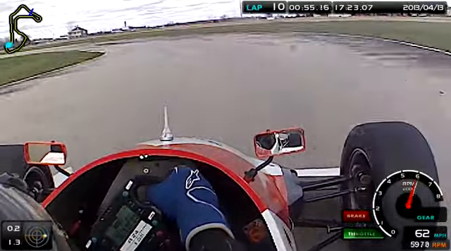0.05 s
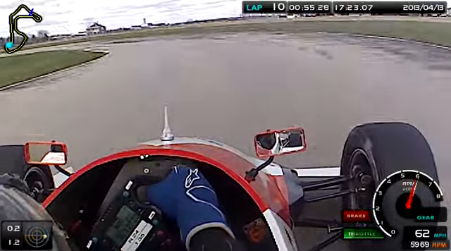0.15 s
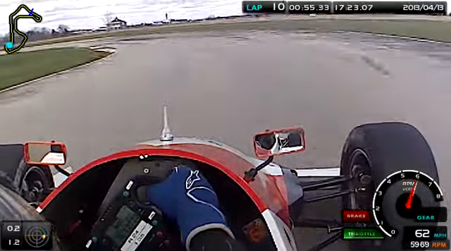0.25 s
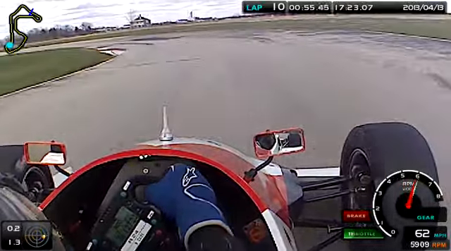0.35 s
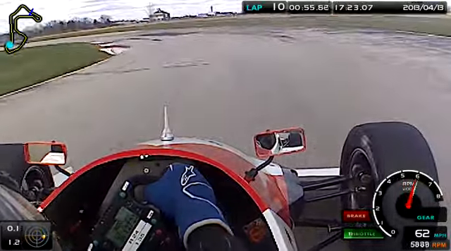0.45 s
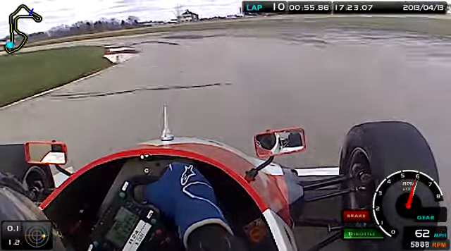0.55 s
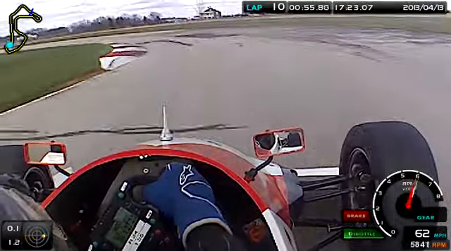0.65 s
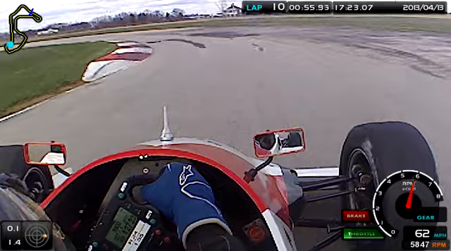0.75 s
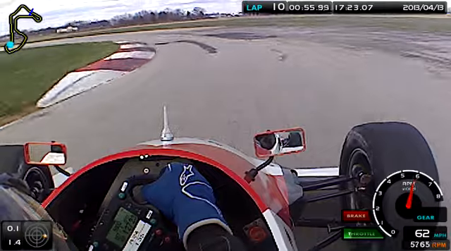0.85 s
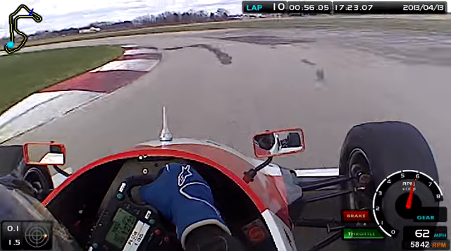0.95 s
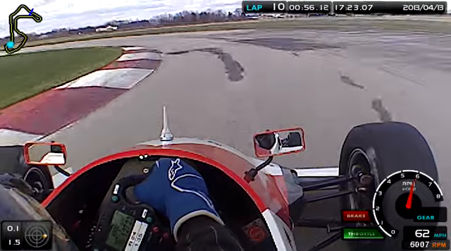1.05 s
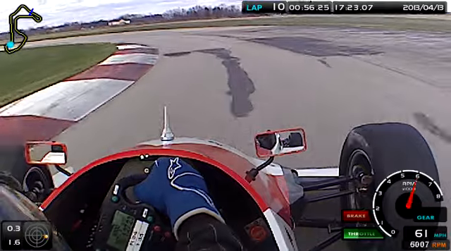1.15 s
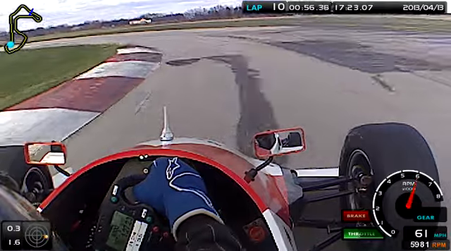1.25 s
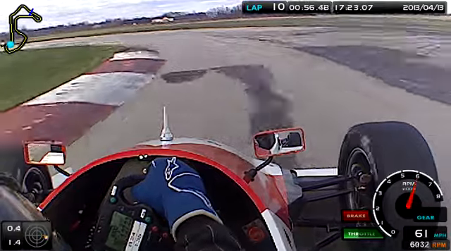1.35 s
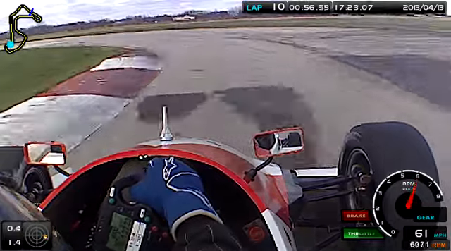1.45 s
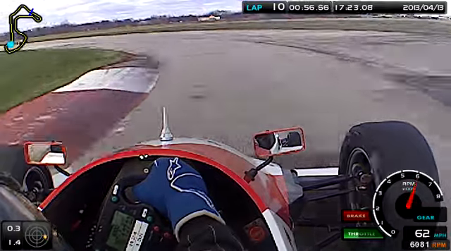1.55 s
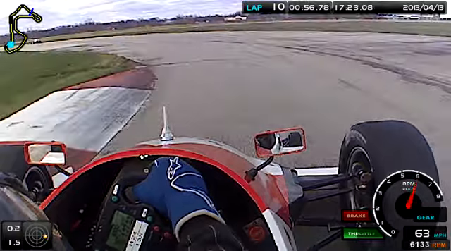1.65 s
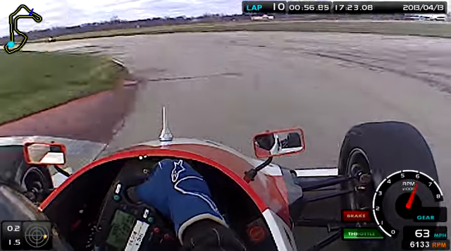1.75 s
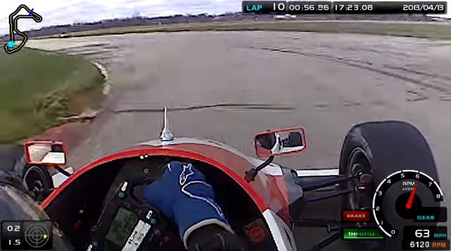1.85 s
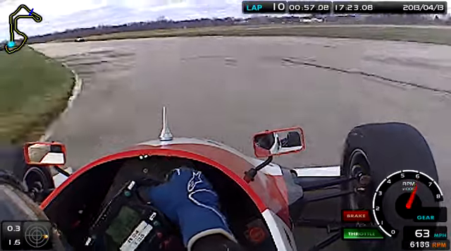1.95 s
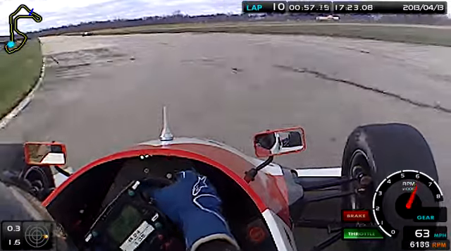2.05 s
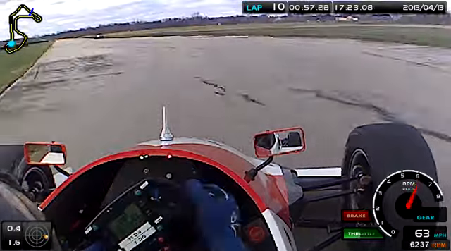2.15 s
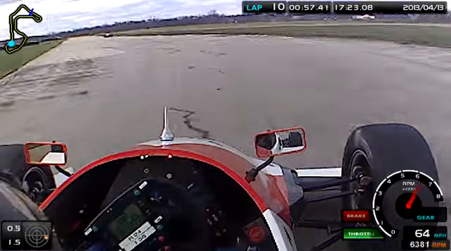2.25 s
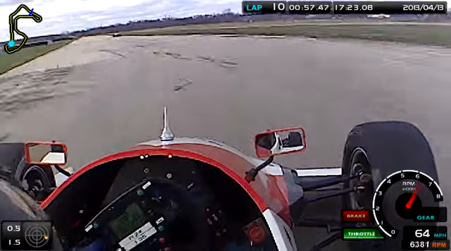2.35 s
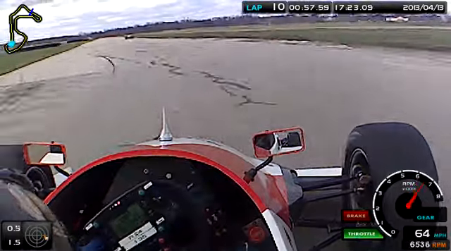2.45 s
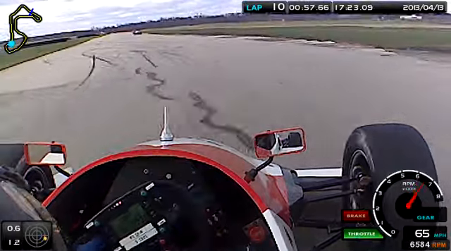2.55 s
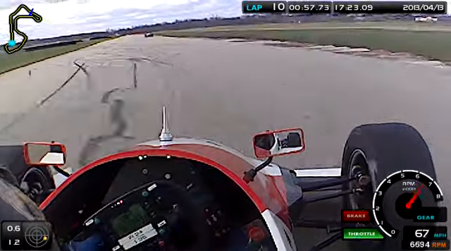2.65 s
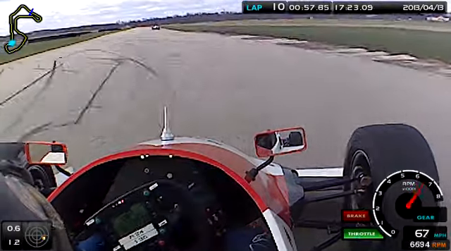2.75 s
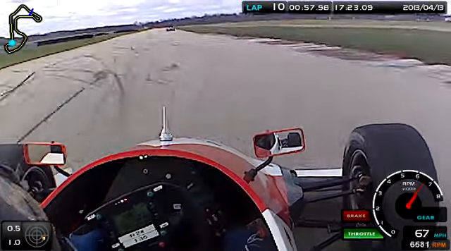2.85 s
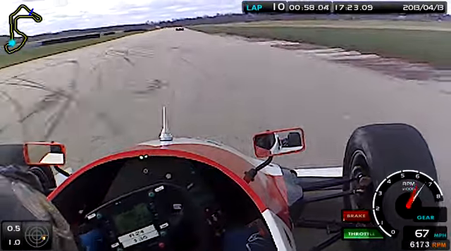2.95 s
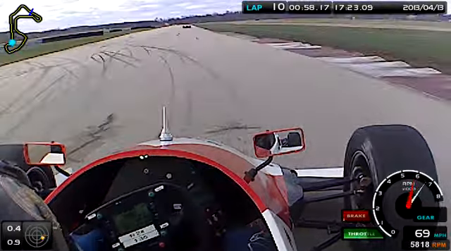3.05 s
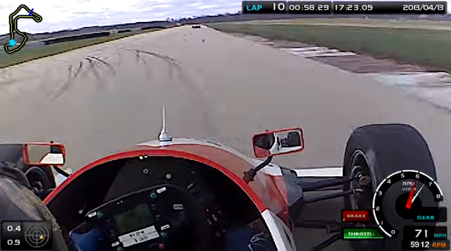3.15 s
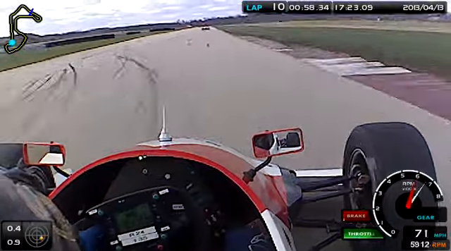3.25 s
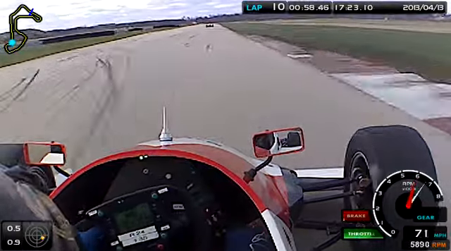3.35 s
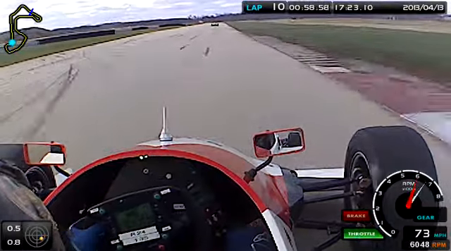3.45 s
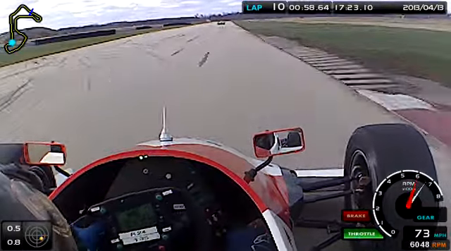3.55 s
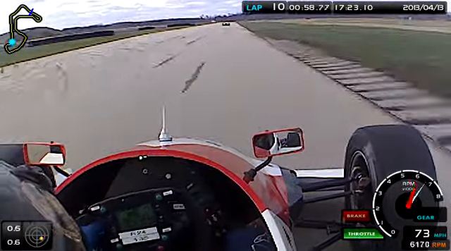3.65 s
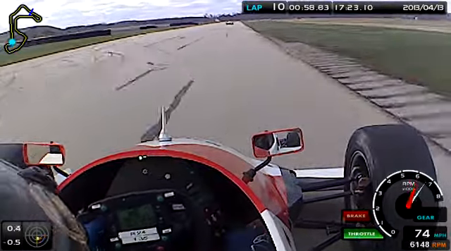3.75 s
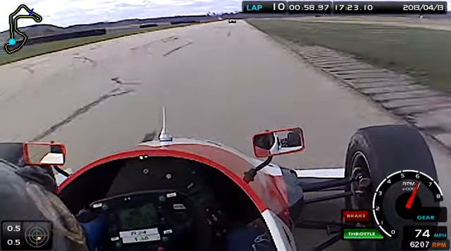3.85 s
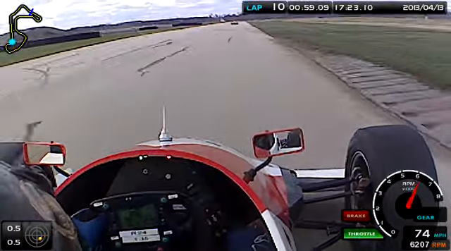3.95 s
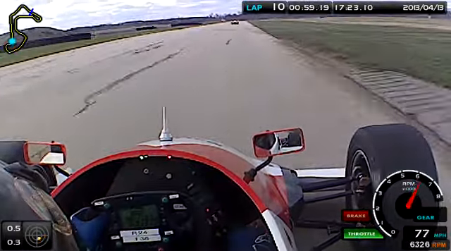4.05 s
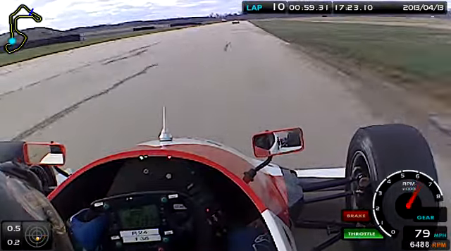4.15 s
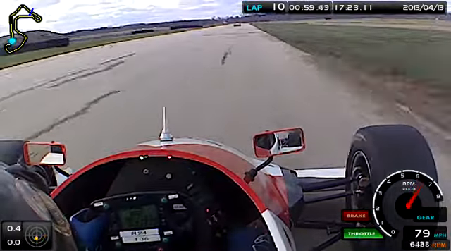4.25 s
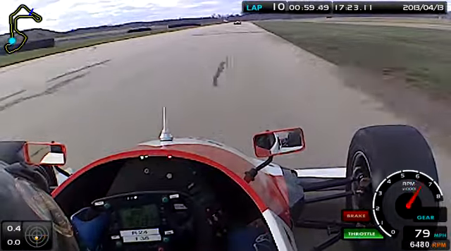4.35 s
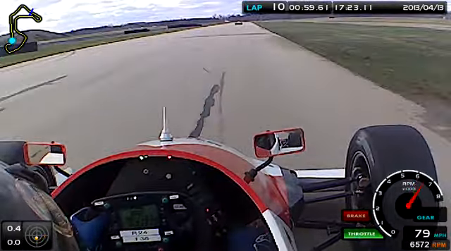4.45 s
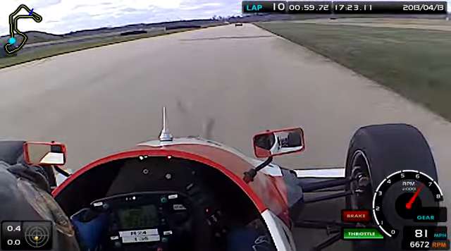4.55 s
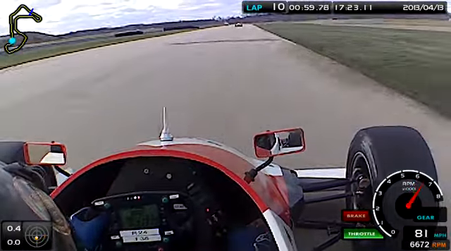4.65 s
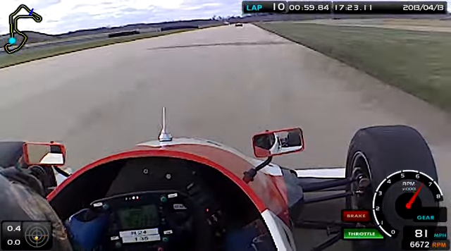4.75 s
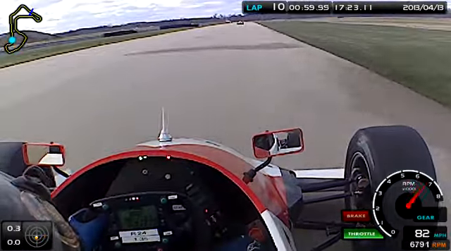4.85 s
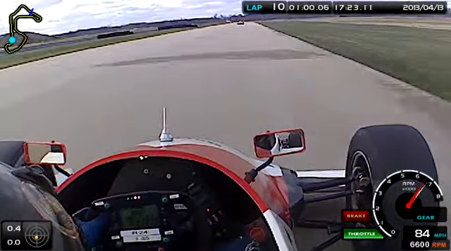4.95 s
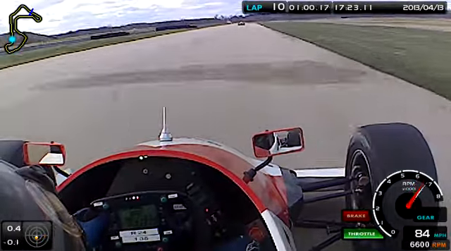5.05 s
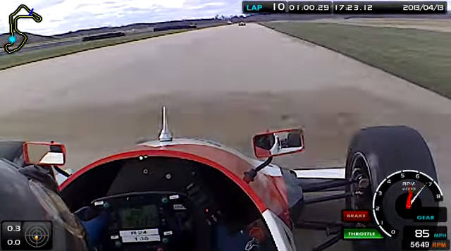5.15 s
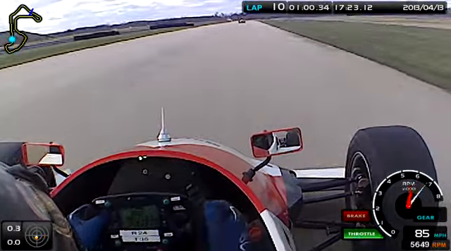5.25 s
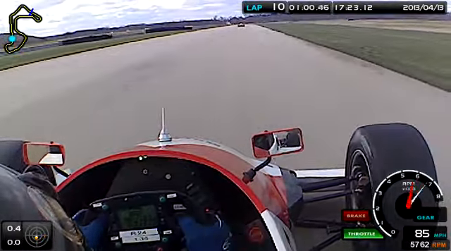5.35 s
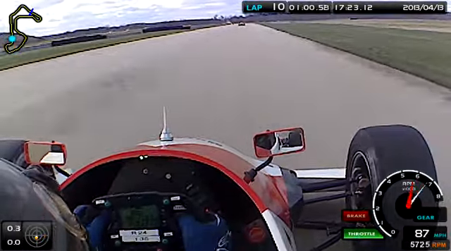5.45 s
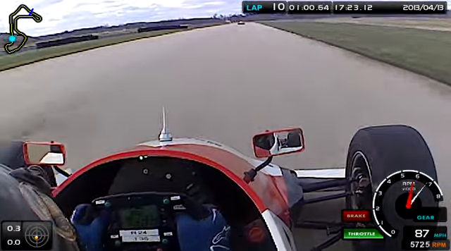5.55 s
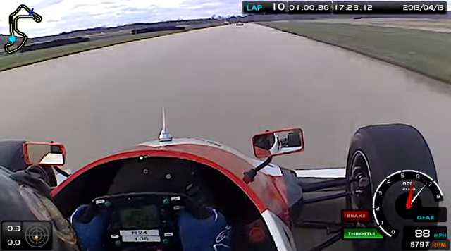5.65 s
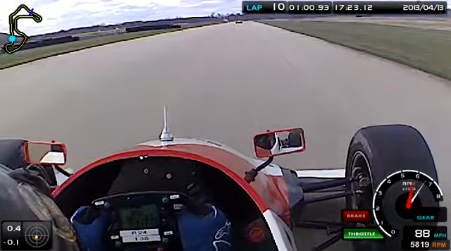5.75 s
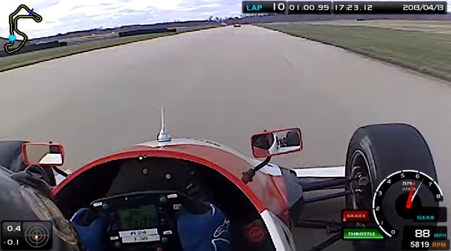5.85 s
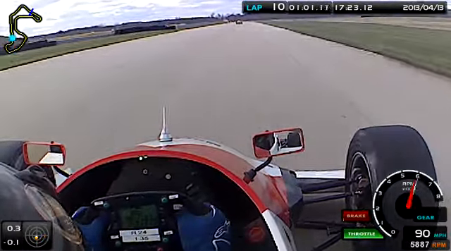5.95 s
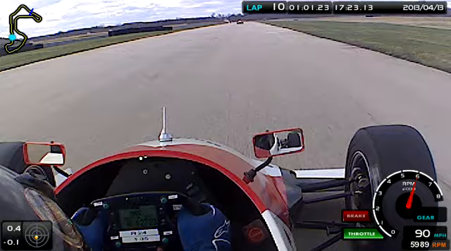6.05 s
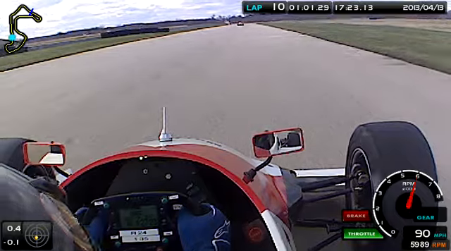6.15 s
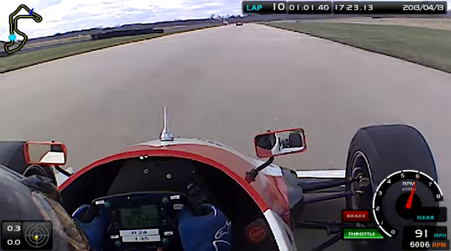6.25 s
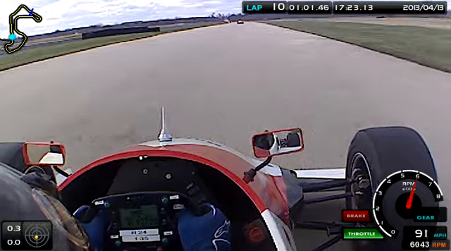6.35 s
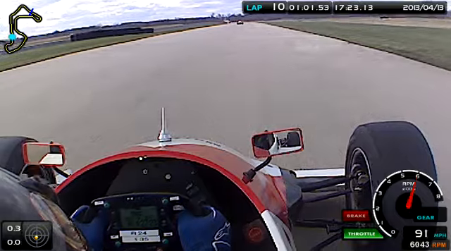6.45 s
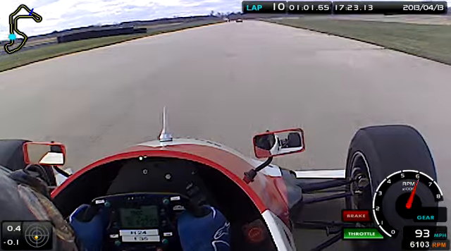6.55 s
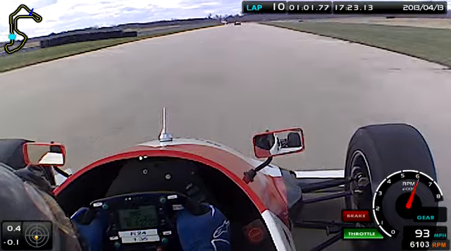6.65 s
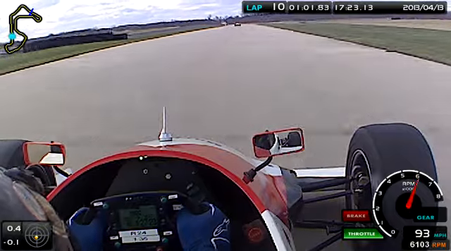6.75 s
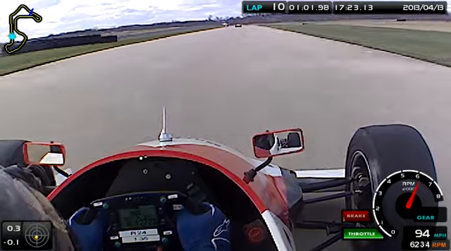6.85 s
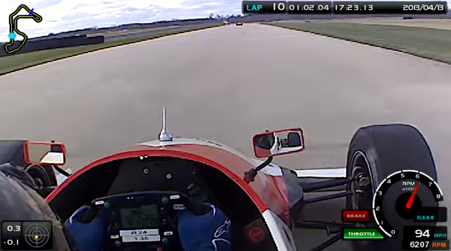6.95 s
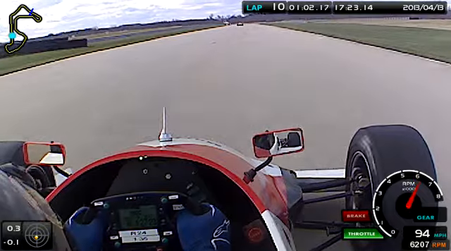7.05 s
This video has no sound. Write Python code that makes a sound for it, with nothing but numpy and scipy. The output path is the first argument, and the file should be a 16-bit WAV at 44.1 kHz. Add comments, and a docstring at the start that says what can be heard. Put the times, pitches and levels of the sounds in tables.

```python
"""A rotary-engined open-wheel race car from the cockpit, its firing pulses ringing the exhaust and
bodywork while wind buffets the microphone. It starts on a feathered throttle through a corner, takes
a stab at the apex (0.7 s) and eases off. From 1.8 s it is flat out, with a hard rasp. At 2.6 s and
4.8 s the spark cuts, the next gear thuds in and the driveline shudders; then the revs climb to the
end. Throughout, the small 16 kHz recorder overloads on the loudest stretches."""
import sys
import numpy as np
from scipy import signal
from scipy.fft import rfft, irfft
from scipy.io import wavfile
from scipy.ndimage import uniform_filter1d

SR = 44100
rng = np.random.default_rng(int(sys.argv[2]) if len(sys.argv) > 2 else 0)


def store_pcm(level_fs):
    """Save levels as 16-bit WAV."""
    pcm = np.round(np.clip(level_fs, -1, 1) * 32767).astype(np.int16)
    wavfile.write(sys.argv[1], SR, np.atleast_2d(pcm).T)


N = 313110
TIME = np.arange(N) / SR
HZ = np.fft.rfftfreq(N, 1 / SR)

# revs of the eccentric shaft, climbing through three gears: (time [s], speed [turns/s])
SHAFT_SPEED = [(0.0, 98.6), (0.43, 98.3), (0.58, 95.9), (0.8, 100.3), (1.09, 100.5), (1.69, 102.5),
               (2.08, 108.0), (2.56, 112.7), (2.69, 104.1), (2.72, 97.9), (2.82, 96.2), (3.25, 100.5),
               (4.7, 114.4), (4.78, 109.5), (4.82, 92.5), (5.29, 95.8), (6.22, 101.4), (7.1, 105.7)]
# the driver's foot: (time [s], throttle [0-1])
THROTTLE = [(.67, .2), (.76, .7), (.95, .7), (1.08, .5), (1.74, .5), (1.83, 1)]
# the mix under the pedal: (throttle [0-1], note [dB], howl [dB], sizzle [dB], fizz [dB],
# shaft-rate throb [dB], firing-rate drone [dB], raggedness [0-1])
THROTTLE_MIX = [(.2, -31.5, -32, -37.5, -41, -18, -24.5, 0.5), (.5, -31, -29, -34, -35.5, -32, -19.5, 0),
                (.7, -26.5, -28.5, -28.5, -33.5, -24, -22, 0.12),
                (1, -26.5, -21, -21.5, -26.5, -48, -47, 0.1)]
# what the firing harmonics excite as the revs sweep up:
# (speed [turns/s], shaft-rate boom [dB], firing-rate boom [dB], howl lift [dB])
SPEED_MIX = [(92.5, -40, -26, -1), (96.1, -37.5, -29.5, -0.5), (98.1, -30, -39, -1.5),
             (99.6, -29, -33.5, -2.5), (102.7, -26, -25, -3.5), (107.2, -24, -26, 1.5),
             (113.1, -22.5, -21.5, -2)]
# each gear's character: (shudder rate [Hz], note [dB], sizzle [dB], fizz [dB], raggedness [factor])
GEARS = [(7.26, -.5, -1.5, -1, 1.32), (6.59, 0.2, 0.5, -2, 0.97), (9.18, -0.53, -1, -2.5, 1.32)]
def engine(mid_speed=100, surge_hz=17.6, first_surge_s=0.037):
    """Two rotors fire into the exhaust; throttle, revs and gear ride the faders of its layers."""
    (speed,), (throttle,) = curves(SHAFT_SPEED), curves(THROTTLE)
    note_db, howl_db, sizzle_db, fizz_db, throb_db, drone_db, ragged = curves(THROTTLE_MIX, throttle)
    shaft_db, firing_db, howl_lift_db = curves(SPEED_MIX, speed)
    _, gear_note_db, gear_sizzle_db, gear_fizz_db, gear_ragged = np.array(GEARS)[gear_at(TIME)].T
    revs_db = 0.2328 * (speed - mid_speed)
    ragged = ragged * gear_ragged * np.exp((mid_speed - speed) / 32)  # smoother as the revs rise
    unlit, cut_db = ignition_cuts()
    noisy = ragged + 0.39 * unlit  # without spark only gas is pumped through
    # on a light throttle the burning comes in surges
    surge = ragged ** 2 * np.cos(2 * np.pi * surge_hz * (TIME - first_surge_s))
    swing = driveline_shudder()
    turns = np.cumsum(speed + swing + 0.99 * surge) / SR
    low_end = boom(turns, np.maximum(shaft_db, throb_db), np.maximum(firing_db, drone_db))
    gas = gas_puffs(turns)
    swell = firings(turns, imbalance=0.083, scatter=0.012, jitter_s=12e-6)  # each pulse's body
    crack = firings(turns, imbalance=0.21, scatter=0.12, jitter_s=7e-6)  # its steep, bright front
    note = exhaust_note(swell, gas, 0.31 * ragged + 0.83 * unlit, note_db + gear_note_db + revs_db)
    treble = howl(crack, gas, noisy, howl_db + howl_lift_db)
    treble += rasp(crack, gas, noisy, swing)
    treble += gain_of(revs_db) * top_end(crack, gas, noisy, sizzle_db + gear_sizzle_db,
                                         fizz_db + gear_fizz_db)
    exhaust = note + flicker(surge, ragged) * treble
    return gain_of(-1.7 - 0.3 * cut_db) * low_end + gain_of(-cut_db) * exhaust


def firings(turns, imbalance, scatter, jitter_s):
    """Two exhaust pulses per shaft turn; the rotors differ, and no two burns are quite alike."""
    stroke = np.floor(2 * turns).astype(int)
    onsets = np.flatnonzero(np.diff(stroke))
    size_chance, time_chance = rng.standard_normal((len(onsets), 2)).T
    size = 1 + imbalance * (-1) ** stroke[onsets] + scatter * size_chance
    place = np.interp(stroke[onsets + 1], 2 * turns, np.arange(N)) + jitter_s * SR * time_chance
    taps = np.round(place).astype(int)[:, None] + np.arange(-8, 9)
    offset = taps - place[:, None]
    pulses = size[:, None] * np.sinc(offset) * np.sinc(offset / 9)  # clicks placed between samples
    return np.bincount(np.clip(taps, 0, N - 1).ravel(), pulses.ravel(), N)


def gas_puffs(turns, decay_cycles=1.0, steady=0.046):
    """Turbulent gas: a burst of noise each time a port opens, fading through the cycle."""
    return (steady + np.exp(-(2 * turns % 1) / decay_cycles)) * rng.standard_normal(N)


# upper resonances of silencer and bodywork: (pitch [Hz], width [Hz], level [dB])
RASP_MODES = [(2042, 51, -2), (2267, 73, 6.5), (2379, 24.5, 8), (2484, 9.7, 0.5), (2602, 62, 6),
              (2761, 40.5, 8.5), (2861, 32.5, 5.5)]
# the rasp's fader through the pull in each gear: (time [s], level [dB])
RASP_LEVEL = [(0.0, -25), (0.67, -26), (0.76, -17.5), (1.37, -18.5), (1.75, -19.5), (1.8, -13),
              (2.28, -7.5), (2.6, -14.5), (2.71, -16), (2.92, -15.0), (2.97, -9.5), (3.24, -13),
              (3.56, -11.9), (3.9, -8.5), (4.44, -13), (4.68, -8), (4.86, -14), (4.93, -9.5), (5.5, -14.5),
              (5.86, -9.5), (5.9, -12), (6.69, -7.5), (7.09, -8)]
# the broad band that the pulse fronts hit hardest: (time [s], centre [Hz])
BITE_CENTRE = [(0, 2280), (.64, 2630), (.73, 2070), (1.3, 2210), (1.78, 2720), (2.3, 2765), (3.1, 2580),
               (3.39, 2760), (3.53, 2470), (4.21, 2570), (4.29, 2430), (4.74, 2530), (4.92, 2570),
               (6.38, 2840), (6.66, 2470), (6.92, 2810)]
def rasp(crack, gas, noisy, swing):
    """The hard edge: pulse fronts ring silencer and bodywork, swelling as the revs flare."""
    (level_db,), (bite_hz,) = curves(RASP_LEVEL), curves(BITE_CENTRE)
    bite = resonate(cockpit_reflections(crack, decay_s=0.0022), bite_hz, width_hz=530)
    gain = gain_of(level_db + 0.77 * swing + 1.03 * wander(rate_hz=24))
    return gain * voiced(bite, gas, RASP_MODES, noisy)


# lower resonances of silencer and bodywork: (pitch [Hz], width [Hz], level [dB])
HOWL_MODES = [(1505, 28, 0), (1567, 55, -2), (1749, 49, -3.5), (1901, 20.3, -1)]
def howl(crack, gas, noisy, level_db):
    """Pulse fronts ring a wavering midrange howl out of silencer and bodywork."""
    return gain_of(level_db + 1.02 * wander(rate_hz=19)) * voiced(crack, gas, HOWL_MODES, noisy)


# resonances of the exhaust pipe: (pitch [Hz], width [Hz], level [dB])
PIPE_MODES = [(475, 81, -10), (590.6, 25, -8), (663.6, 46, -12), (827, 75, -15.5), (1010, 36, -14),
              (1077.5, 24, -11), (1450, 225, -22.5)]
def exhaust_note(swell, gas, noisy, level_db):
    """The body of each pulse rings the pipe."""
    return gain_of(level_db + 0.8 * wander(rate_hz=11)) * voiced(swell, gas, PIPE_MODES, noisy)


def boom(turns, shaft_db, firing_db):
    """The low end: one wavering sine at the shaft rate, one at the firing rate an octave up."""
    return sum(np.sqrt(2) * gain_of(db + 1.1 * wander(rate_hz=26)) * np.sin(2 * np.pi * order * turns)
               for order, db in ((1, shaft_db), (2, firing_db)))


# top resonances of silencer and bodywork: (pitch [Hz], width [Hz], level [dB])
SIZZLE_MODES = [(2990, 42, -17), (3189, 140, -14), (3409, 123, -16), (3767, 90, -18.5)]
# the highest, broad resonances of the exhaust: (pitch [Hz], width [Hz], level [dB])
FIZZ_MODES = [(3590, 125, -25.5), (4223, 165, -22.5), (4960, 700, -32), (6020, 410, -35.5), (7460, 52, -35)]
def top_end(crack, gas, noisy, sizzle_db, fizz_db):
    """Sizzle and fizz from blurred pulse fronts: the higher the band, the more of it is turbulence."""
    blurred = cockpit_reflections(crack, decay_s=0.0035)
    sizzle = gain_of(sizzle_db) * voiced(blurred, gas, SIZZLE_MODES, 0.14 + noisy)
    fizz = gain_of(fizz_db) * voiced(blurred, gas, FIZZ_MODES, 0.39 + 1.6 * noisy)
    return sizzle + fizz


# the treble ducks briefly: (time [s], depth [dB])
TREBLE_DIPS = [(1.87, 7), (2.125, 4), (2.859, 3.5), (3.065, 2), (4.14, 4), (5.41, 2)]
def flicker(surge, ragged, dip_half_s=0.015):
    """Gain on the treble: ragged burning makes it stutter and flutter, and now and then it dips."""
    flutter_db = (0.49 + 0.88 * ragged) * wander(rate_hz=16)
    dip_db = bumps((s, dip_half_s, db) for s, db in TREBLE_DIPS)
    return gain_of(5 * surge + flutter_db - dip_db)


# jolts from the road and the gear change: (time [s], swing [turns/s])
JOLTS = [(0.013, 3.3), (0.12, 2.2), (1.624, 2.2), (1.795, 3.7), (1.974, 6.5), (2.295, 4.6), (2.503, 5.3),
         (2.965, 2.8), (3.33, 2.5), (3.646, 2.1), (3.809, 2.4), (4.108, 1.8), (4.86, 5.0), (5.167, 2.1)]
def driveline_shudder(decay_s=0.06994):
    """Each jolt winds up the driveline, and the revs swing about their course until it settles."""
    swing = 0.34 * wander(rate_hz=15)  # the grain of the road keeps the revs trembling
    for s, size in JOLTS:
        age = np.maximum(TIME - s, 0)
        shudder_hz = GEARS[gear_at(s)][0]
        swing += size * np.exp(-age / decay_s) * np.sin(2 * np.pi * shudder_hz * age)
    return swing


# upshift cues: (spark off [s], spark on [s], exhaust cut [dB], gear bites [s], thud level [dB])
UPSHIFTS = [(2.618, 2.693, 15.5, 2.648, -13), (4.752, 4.83, 11.5, 4.784, -16)]
def ignition_cuts(edge_s=0.0079):
    """The spark drops out for each shift: how far it is off (0-1), and the exhaust's loss in dB."""
    gates = [0.5 * (np.tanh((TIME - off) / edge_s) - np.tanh((TIME - on) / edge_s))
             for off, on, *_ in UPSHIFTS]
    return sum(gates), sum(gate * depth_db for gate, (_, _, depth_db, *_) in zip(gates, UPSHIFTS))


def gear_at(s):
    """Which gear is in: the number of upshifts made so far."""
    return sum(np.int64(s > (off + on) / 2) for off, on, *_ in UPSHIFTS)


def gearbox(thud_hz=85, decay_s=0.012):
    """Each new gear takes up the drive with a short, dull thud through the chassis."""
    thuds = np.zeros(N)
    for *_, s, db in UPSHIFTS:
        age = np.maximum(TIME - s, 0)
        envelope = np.exp(1 - age / decay_s) * age / decay_s
        thuds += gain_of(db) * envelope * np.sin(2 * np.pi * thud_hz * age)
    return thuds


# tone of the wind on the microphone: (frequency [Hz], level [dB])
WIND_SPECTRUM = [(10, -34.5), (25, -6.5), (45, -8.5), (80, -7.5), (115, -11), (160, -16), (250, -22.5),
                 (400, -29.5), (1000, -51.5), (8000, -81)]
# its rise as the car gathers speed: (start level [dB], end level [dB])
WIND_RISE = [-30, -27.5]
# gusts on top: (time [s], half length [s], lift [dB])
GUSTS = [(.05, 0.52, 5.5), (1.564, 0.34, 5), (2.56, 0.18, 3), (5.203, 0.069, 4.5), (6.4, 0.63, 2.5)]
def wind():
    """Air buffets the microphone with a lumpy rumble."""
    level_db = np.interp(TIME, [0, N / SR], WIND_RISE) + bumps(GUSTS) + 2.5
    return gain_of(level_db) * steadied(coloured(rng.standard_normal(N), WIND_SPECTRUM), window=5000)


# tone of the road bed: (frequency [Hz], level [dB])
ROAR_SPECTRUM = [(60, -18), (200, -3), (310, -4.5), (500, -11), (750, -6.5), (1200, -16.5), (1600, 0.5),
                 (2800, -23), (4500, -14), (7600, -17.5), (9000, -47)]
def road_roar():
    """Air, tyres and chassis roar more with road speed, less while the engine stops shaking the car."""
    _, cut_db = ignition_cuts()
    level_db = np.interp(TIME, [0, N / SR], [-37.5, -33.5]) - 0.096 * cut_db + 2 * wander(rate_hz=42)
    return gain_of(level_db) * unit_rms(coloured(rng.standard_normal(N), ROAR_SPECTRUM))


def cockpit_reflections(x, decay_s, taps=900):
    """Dense early reflections from the cockpit walls blur each pulse, leaving its spectrum flat."""
    echoes = rfft(rng.standard_normal(taps) * np.exp(-np.arange(taps) / (decay_s * SR)), N)
    return irfft(rfft(x) * echoes / abs(echoes), N)


def voiced(pulses, gas, modes, noisy):
    """Pulses and gas ring the same resonances; noisy is the gas's share of the power."""
    noisy = np.clip(noisy, 0, 1)
    return np.sqrt(1 - noisy) * ring(pulses, modes) + np.sqrt(noisy) * ring(gas, modes)


def ring(x, modes):
    """Steep-sided resonances that ring after each pulse, held at a steady level."""
    power = sum(gain_of(db) ** 2 / (1 + ((HZ - hz) / width) ** 2) ** 2 for hz, width, db in modes)
    cepstrum = irfft(0.5 * np.log(power + 1e-10), N)
    cepstrum[1:N // 2] *= 2  # fold to minimum phase: no ringing ahead of the hit
    cepstrum[N // 2 + 1:] = 0
    return steadied(irfft(rfft(x - x.mean()) * np.exp(rfft(cepstrum)), N))


def resonate(x, centre_hz, width_hz):
    """A broad resonance with a moving centre."""
    carrier = np.exp(2j * np.pi * np.cumsum(centre_hz) / SR)
    pole = np.exp(-np.pi * width_hz / SR)
    return 2 * (carrier * signal.lfilter([1 - pole], [1, -pole], x / carrier)).real


def coloured(x, points):
    """An EQ drawn through (frequency [Hz], gain [dB]) points."""
    hz, db = np.transpose(points)
    return irfft(rfft(x) * gain_of(np.interp(np.log(HZ + 1), np.log(hz), db)), N)


def wander(rate_hz):
    """Random drift of rms 1, rolled off above the given rate."""
    return unit_rms(irfft(rfft(rng.standard_normal(N)) / (1 + (HZ / rate_hz) ** 4), N))


def curves(rows, control=TIME):
    """Automation lanes: each further column, read where the first equals the control."""
    points, *columns = np.transpose(rows)
    return [np.interp(control, points, column) for column in columns]


def bumps(rows):
    """Bell-shaped fader moves from (time [s], half length [s], height [dB]) rows."""
    return sum(db * np.exp(-((TIME - s) / half_s) ** 2) for s, half_s, db in rows)


def steadied(x, window=2600):
    """Holds the running rms at 1, so that a level curve alone sets the loudness."""
    power = uniform_filter1d(uniform_filter1d(x ** 2, window), window)
    return x / np.sqrt(abs(power) + 1e-12)


def unit_rms(x):
    """Scales to rms 1."""
    return x / np.sqrt(np.mean(x ** 2) + 1e-20)


def gain_of(db):
    """Decibels to amplitude."""
    return 10 ** (np.asarray(db) / 20)


def scene():
    """Engine, gearbox, wind and road at the one microphone."""
    return (engine() + gearbox() + wind() + road_roar())[None]


# what the recorder lets through: (frequency [Hz], gain [dB])
RECORDER_EQ = [(10, 1), (6000, -1), (7900, -7), (8400, -11), (9000, -13), (12000, -8.5), (16000, -6)]
def record(dry, ceiling=0.7, knee=16.0, drive_db=1.5, image_db=-36, rate_hz=16000, edge_hz=15800):
    """The recorder flattens peaks and dulls the top; overload fizz mirrors about its sample rate."""
    driven = gain_of(drive_db) * dry[0]
    clipped = driven / (1 + abs(driven / ceiling) ** knee) ** (1 / knee)
    image = 2 * gain_of(image_db) * (driven - clipped) * np.cos(2 * np.pi * rate_hz * TIME)
    lowpass = signal.firwin(511, edge_hz, window=("kaiser", 9), fs=SR)
    return signal.oaconvolve(coloured(clipped, RECORDER_EQ) + image, lowpass, "same")[None]


dry = scene()
out = record(dry)
store_pcm(out)
```